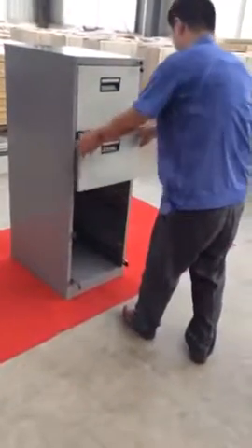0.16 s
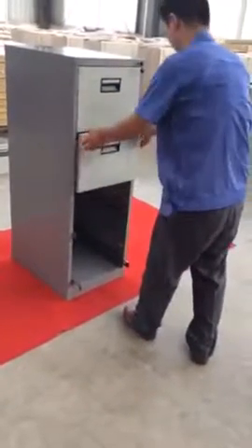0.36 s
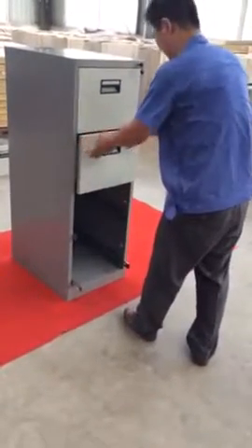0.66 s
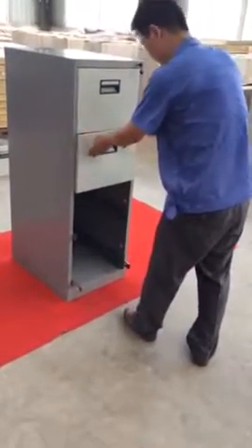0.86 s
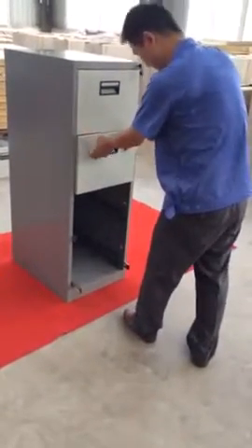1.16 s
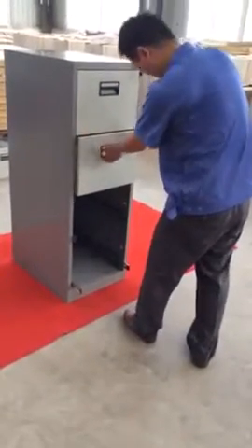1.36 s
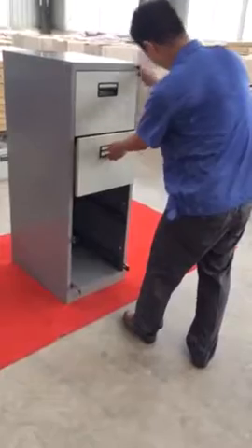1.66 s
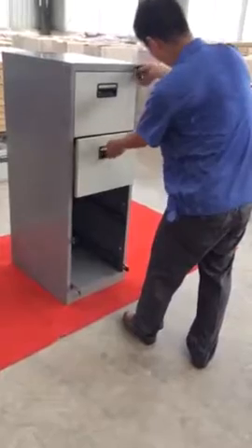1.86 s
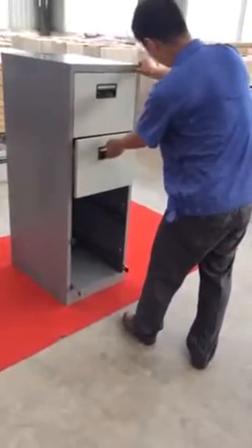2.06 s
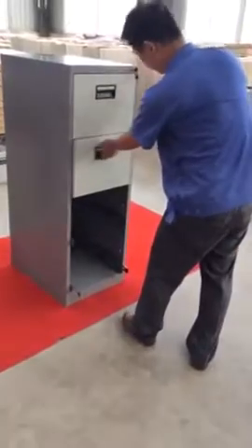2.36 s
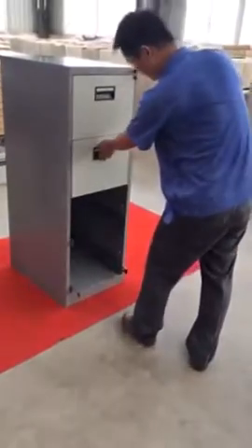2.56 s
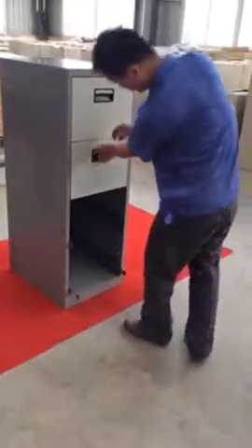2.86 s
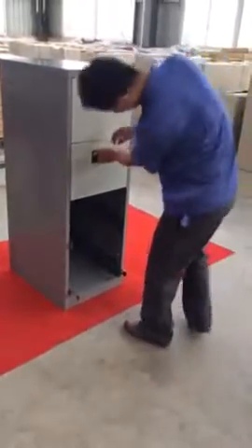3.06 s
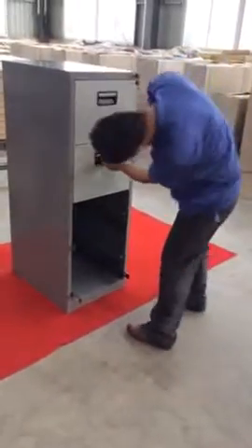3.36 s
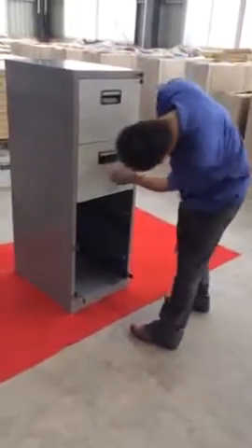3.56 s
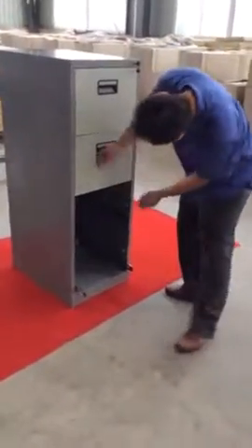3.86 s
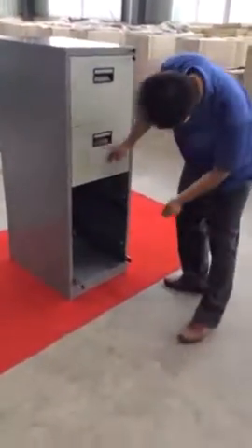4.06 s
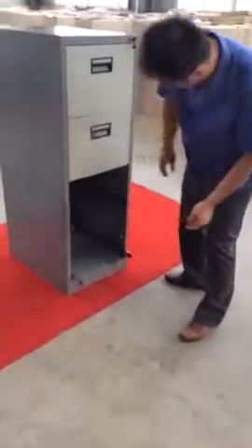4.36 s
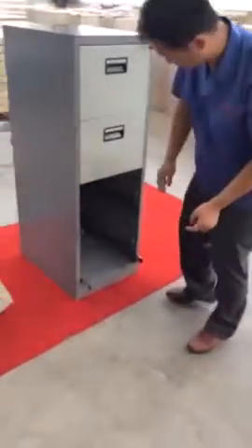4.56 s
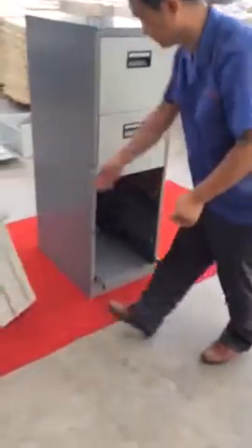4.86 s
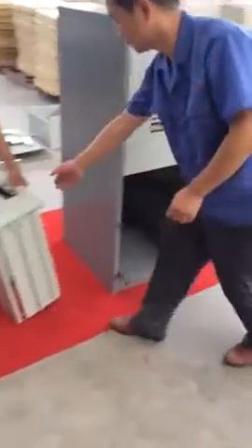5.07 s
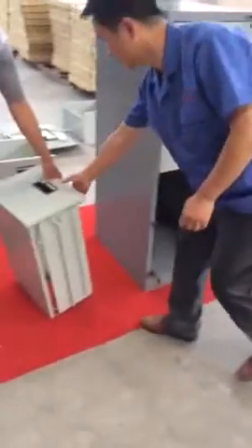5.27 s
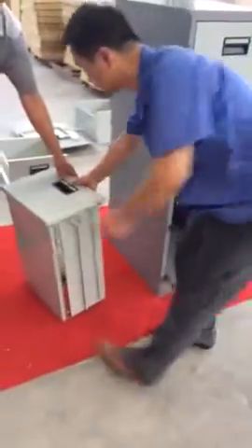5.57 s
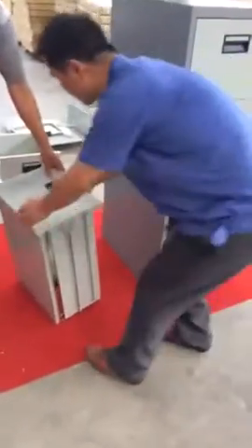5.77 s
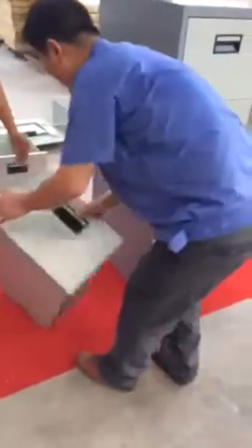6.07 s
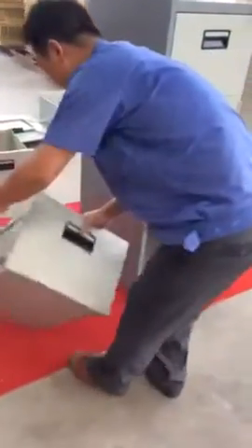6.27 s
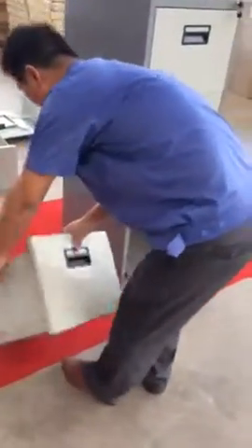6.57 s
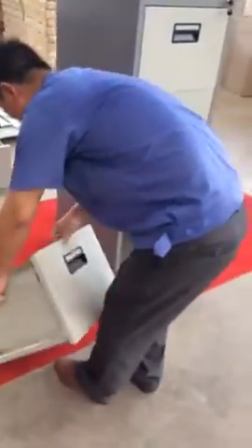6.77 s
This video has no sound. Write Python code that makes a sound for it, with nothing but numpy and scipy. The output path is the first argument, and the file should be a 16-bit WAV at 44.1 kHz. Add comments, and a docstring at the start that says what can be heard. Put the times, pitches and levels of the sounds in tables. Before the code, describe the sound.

In a large reverberant factory with a steady low machine hum, a sheet-metal drawer rattles along its slide and bangs in, with a lighter thud after. Faint handle and latch taps lead to the loudest slam, ringing hollowly. Compressed air hisses far off, with one dull knock over it; as it dies away, another drawer bumps and drags. Close, fairly dry mono pickup with slightly dulled top treble.

```python
"""A steel drawer is already scraping and squeaking along its runners, over the hum of machines.
It crashes into its filing cabinet; later it is slammed and pushed shut, and the next one is moved.
Each knock rings the sheet steel: many fading tones over a noisy crowd of weaker ones.
Scrapes are streams of tiny slips, squeaks are narrow noisy tones, and thumps are low fading swings.
Across the factory hall an air jet, made of coloured noise, hisses for some seconds; the hall echoes."""
import sys
import numpy as np
from scipy import signal
from scipy.fft import rfft, irfft, next_fast_len
from scipy.io import wavfile
from scipy.ndimage import uniform_filter1d

SR = 44100
rng = np.random.default_rng(int(sys.argv[2]) if len(sys.argv) > 2 else 0)


def wrap_up_sound(samples):
    """Save the sound to the file named by the first command line argument, as 16-bit audio."""
    columns = np.atleast_2d(samples).T
    # keep every value between -1 and 1, then stretch to whole-number steps
    tamed = np.clip(columns, -1, 1)
    steps = np.round(tamed * 32767).astype(np.int16)
    wavfile.write(sys.argv[1], SR, steps)


N = 304731
TIME = np.arange(N) / SR


def gain_of(db):
    """Turns decibels into a factor for loudness."""
    return 10 ** (np.asarray(db) / 20)


def evened(x):
    """Scales a sound to an average (rms) strength of one."""
    return x / np.sqrt(np.mean(x ** 2) + 1e-20)


def read(points, hz):
    """Reads a value between the rows of a table, with pitch on a log scale."""
    table_hz, value = np.transpose(points)
    return np.interp(np.log(hz + 1), np.log(table_hz + 1), value)


def fade(t, t60_s):
    """An even dying-away that loses 60 dB in t60_s seconds."""
    return np.exp(-np.log(1000) * t / t60_s)


def add(mix, start_s, sound):
    """Mixes a sound in at a given time, never before the beginning."""
    start = max(round(start_s * SR), 0)
    part = mix[start:][:len(sound)]
    part += sound[:len(part)]


def coloured(x, colour):
    """Makes some pitches of a sound stronger than others, then evens its strength."""
    hz = np.fft.rfftfreq(len(x), 1 / SR)
    return evened(irfft(rfft(x) * gain_of(read(colour, hz)), len(x)))


def noise(colour):
    """Steady noise of a given colour."""
    return coloured(rng.standard_normal(next_fast_len(N)), colour)[:N]


def wavering_tone(pitch_hz, width_hz, size):
    """Noise squeezed into a narrow band, so that it sounds like an unsteady tone."""
    hz = np.fft.rfftfreq(size, 1 / SR)
    resonance = 1 / (1 + (2 * (hz - pitch_hz) / width_hz) ** 2)
    return evened(irfft(rfft(rng.standard_normal(size)) * resonance, size))


def dying(x, t60_table):
    """Lets each band of a sound die away at its own speed."""
    hz, t, bands = signal.stft(x, SR, nperseg=256)
    bands = bands * fade(t, read(t60_table, hz)[:, None])
    return signal.istft(bands, SR, nperseg=256)[1][:len(x)]


def envelope(start_s, stop_s, rise_s, t60_s):
    """A smooth rise, a hold and a dying release."""
    rise = np.sin(np.pi / 2 * np.clip((TIME - start_s) / rise_s, 0, 1)) ** 2
    return rise * fade(np.maximum(TIME - stop_s, 0), t60_s)


# low wash of machinery in the hall: pitch_hz, level_db (per Hz, relative)
MACHINE_COLOUR = [(20, -34), (30, -6), (39, 2), (52, -3.5), (80, 3.5), (140, 1.5), (210, -1), (280, -3.5),
                  (450, -11.5), (1000, -19), (2000, -22.5), (4000, -28.5), (8000, -32.5), (10500, -37)]
# unsteady hum of the machines: pitch_hz, width_hz, level_db
MACHINE_HUM = [(191.6, 15.4, -45), (166.4, 52, -46.5), (143, 15, -52)]


def machinery(wash_db=-37.5):
    """Distant machines blend into a low wash of noise, with a few unsteady hums."""
    hum = sum(gain_of(db) * wavering_tone(hz, width_hz, N) for hz, width_hz, db in MACHINE_HUM)
    return gain_of(wash_db) * noise(MACHINE_COLOUR) + hum


# how long the hall echoes, until 60 dB weaker: pitch_hz, t60_s
HALL_T60 = [(100, 2.6), (500, 1.5), (2000, 2.73), (4500, 1.4), (7000, 1.38), (10500, 0.84)]


def hall(x, delay_s=.018, drift_hz=1.29, count=3):
    """Sound scatters around the hall in a long echo; its paths swell and fade in turn."""
    out = np.zeros(N)
    for k in range(count):
        tail = dying(rng.standard_normal(2 * SR), HALL_T60)
        tail = tail / np.linalg.norm(tail)
        share = np.sqrt(2 / count) * np.cos(np.pi * (drift_hz * TIME + k / count))
        add(out, delay_s, signal.fftconvolve(x * share, tail)[:N])
    return out


# hiss of the air jet: pitch_hz, level_db (per Hz, relative)
JET_COLOUR = [(400, -22), (1000, -16), (1600, -11), (2300, -6.5), (3200, -2), (5000, 0.5), (6700, 1.5),
              (8500, 0.5), (10500, -6.5)]
# the valve opens with a surge, the pressure settles and slowly sags, the valve shuts
JET_OPEN_S, JET_SHUT_S, JET_RISE_S, JET_T60_S = 2.913, 6.344, 0.21, 0.94
JET_DB = -30  # at the jet, before the scene mixes it in
JET_SURGE_DB, JET_SETTLE_S, JET_SAG_DB_PER_S = 3.5, .45, 0.33


def air_jet(flutter_db=1.23):
    """Turbulent air hisses with a strength that follows its pressure and flutters slightly."""
    flutter = rng.standard_normal(N)
    for _ in range(2):
        flutter = uniform_filter1d(flutter, size=1200)  # smoothing leaves only slow changes
    open_s = np.maximum(TIME - JET_OPEN_S, 0)
    surge_db = JET_SURGE_DB * np.exp(-open_s / JET_SETTLE_S)
    pressure_db = JET_DB + surge_db - JET_SAG_DB_PER_S * open_s
    valve = envelope(JET_OPEN_S, JET_SHUT_S, JET_RISE_S, JET_T60_S)
    return valve * noise(JET_COLOUR) * gain_of(pressure_db + flutter_db * evened(flutter))


# lowest ringing tones of the big side panels: pitch_hz, width_hz, level_db (relative)
DRUM_MODES = [(85, 15, -6), (113.5, 22, -0.5), (178, 34, -6)]
DRUM_START_S, DRUM_STOP_S, DRUM_RISE_S, DRUM_T60_S, DRUM_DB = 2.64, 2.9, .03, 0.65, -31.5


def drumming():
    """The big side panels go on booming at their lowest tones after the slam."""
    boom = evened(sum(gain_of(db) * wavering_tone(hz, width_hz, N) for hz, width_hz, db in DRUM_MODES))
    return gain_of(DRUM_DB) * envelope(DRUM_START_S, DRUM_STOP_S, DRUM_RISE_S, DRUM_T60_S) * boom


# whole cabinet jolted by a drawer going home:
# start_s, level_db (of the swing before it fades), pitch_hz, t60_s (time to fade by 60 dB)
THUMPS = [(0.331, -24.5, 155.6, 0.22), (0.901, -27, 106, .18), (2.634, -19, 101, .12),
          (2.648, -10.5, 169, 0.064), (3.961, -16, 97, .16)]


def thumps(rise_s=0.00085):
    """A jolt sets the big panels swinging at a low pitch that soon dies away."""
    out, t = np.zeros(N), np.arange(SR // 2) / SR
    for start_s, db, hz, t60_s in THUMPS:
        swing = -np.sin(2 * np.pi * hz * t) * (1 - np.exp(-t / rise_s))
        add(out, start_s, gain_of(db) * swing * fade(t, t60_s))
    return out


# squeaks of the runners: middle_s, length_s, pitch_hz, level_db (before the soft ends)
SQUEAKS = [(.012, 0.019, 7400, -44), (.032, 0.023, 7400, -46), (.054, 0.017, 7650, -45),
           (.16, 0.5, 3680, -55), (0.232, 0.049, 4050, -48), (1.454, 0.29, 1073, -53),
           (2.288, 0.04, 2920, -50.5)]


def squeaks(width_share=0.047):
    """Metal that sticks and slips gives short, rough tones."""
    out = np.zeros(N)
    for middle_s, length_s, hz, db in SQUEAKS:
        size = int(length_s * SR)
        soft_ends = signal.windows.tukey(size, .7)
        tone = wavering_tone(hz, width_share * hz, size) * soft_ends
        add(out, middle_s - length_s / 2, gain_of(db) * tone)
    return out


# clear ringing tones (modes) of cabinet and drawers: pitch_hz, level_db (relative), t60_s
STEEL_MODES = [(128, -7, .4), (183, 1, .3), (243, -3, .3), (362, -10, .3), (474, -8, .4), (521, -4, .25),
               (560, -10, .35), (655, -3, .28), (690, -5, .25), (768, -3, .33), (917, -3, .29),
               (968, -7, .26), (1068, -3, .28), (1108, -9, .35), (1266, 1, .2), (1311, -2, .22),
               (1415, 0, .18), (1490, -4, .16), (1696, -8, .2), (2320, -1, .17), (2820, -3, .15),
               (3159, -4, .16), (3816, -11, .11), (4718, -7, .13), (4965, -5, .13), (5100, -6, .13)]
# crowd of weaker modes between them: pitch_hz, level_db (per Hz, relative)
STEEL_CROWD = [(50, -11), (150, 11), (350, 7.5), (700, 6), (1400, 3.5), (2000, 2), (3500, 1), (5200, -0.5),
               (7200, -2.5), (10500, -5)]
# how long that crowd rings, until 60 dB weaker: pitch_hz, t60_s
STEEL_CROWD_T60 = [(100, 0.48), (500, 0.33), (1400, 0.24), (4000, 0.18), (10000, 0.16)]


def sheet_steel(modes_db=-13, scatter_db=1.5, detune=0.0012, size=26460):
    """One blow rings clear modes, stirred differently at each spot, over a crowd of weak ones."""
    t = np.arange(size) / SR
    hz, db, t60_s = np.transpose(STEEL_MODES)[:, :, None]
    spot, strain = rng.standard_normal((2,) + hz.shape)
    bent_hz = hz * (1 + detune * strain)  # a flexed sheet shifts its pitch
    swing = np.sin(2 * np.pi * (bent_hz * t + rng.random(hz.shape)))
    modes = (gain_of(db + scatter_db * spot) * fade(t, t60_s) * swing).sum(0)
    crowd = dying(coloured(rng.standard_normal(size), STEEL_CROWD), STEEL_CROWD_T60)
    return gain_of(modes_db) * modes + crowd


# strokes of a drawer along its runners or over the floor:
# middle_s, length_s, scrape_db, swish_db (both at the fastest moment)
STROKES = [(.03, 1.02, -37.5, -53.5), (1.658, .64, -47, -51), (2.11, 0.22, -41, -63),
           (2.643, 0.5, -43.5, -55), (6.873, 0.95, -34.5, -52)]


def strokes(scrape_power=0.53, swish_power=1.7):
    """Each stroke speeds up and slows down in one arch; scrape and swish grow as powers of speed."""
    scrape, swish = np.zeros((2, N))
    for middle_s, length_s, scrape_db, swish_db in STROKES:
        speed = np.maximum(1 - (2 * (TIME - middle_s) / length_s) ** 2, 0)
        scrape += gain_of(scrape_db) * speed ** scrape_power
        swish += gain_of(swish_db) * speed ** swish_power
    return scrape, swish


# scrape of a dragged drawer: pitch_hz, level_db (per Hz, relative)
DRAG_COLOUR = [(100, 11.5), (300, 5), (700, 2.5), (1200, 4), (2000, 1.5), (3700, 2.5), (6000, -3),
               (10500, -35)]
# fine swish of ball slides and handled sheet metal: pitch_hz, level_db (per Hz, relative)
SWISH_COLOUR = [(800, -15), (2000, -17), (3200, -6), (5000, -3), (8000, -1), (10500, -11)]


def runners(slips_per_s=220, spread_db=2.0, count=4):
    """Tiny uneven slips rattle the steel at several contact points, under the swish of the slides."""
    rattle, length = np.zeros(N), N + SR  # one second of lead-in: the drawer is already moving
    for _ in range(count):
        uneven_db = spread_db * np.minimum(rng.exponential(1, length), 4)
        strength = gain_of(uneven_db) * rng.choice([-1, 1], length)
        slips = strength * (rng.random(length) < slips_per_s / SR)
        steel = sheet_steel(modes_db=-24.5)  # the hand damps the clear modes
        rattle += signal.fftconvolve(slips, steel)[SR:length]
    scrape, swish = strokes()
    return scrape * coloured(rattle, DRAG_COLOUR) + swish * noise(SWISH_COLOUR)


# knocks of drawer, runner and latch, in order: the drawer catches on its runners and crashes in,
# is nudged up to the frame, handle and latch are tried, the slam and its rebounds,
# a last dull push on the shut drawer, then the next drawer bumps as it is lifted:
# start_s, level_db (over the first 20 ms), contact_hz (pitch of the contact), q (its sharpness, no unit)
KNOCKS = [ (.292, -35, 1710, 1.4), (.308, -28, 1840, 0.93), (0.318, -30.5, 8000, .6),
          (0.3234, -20, 5050, 1.4), (.327, -24.5, 1360, 1.06), (.344, -25, 3300, 0.3),
          (.856, -39.5, 3800, 0.35), (.863, -31.5, 1530, 1.1), (.868, -38.5, 5000, 1.1),
          (.902, -30, 700, .4), (.916, -30, 770, 0.43), (2.023, -45, 1400, 1.4), (2.037, -37.5, 1520, 0.91),
          (2.038, -51, 8100, 2.5), (2.092, -41, 3800, 0.65), (2.100, -36.5, 1400, 1.3),
          (2.155, -45.5, 4600, 1), (2.325, -44, 1810, 1.3), (2.485, -39.5, 1430, 4.3),
          (2.514, -51, 7000, 0.99), (2.626, -24, 1950, 0.49), (2.627, -43, 8800, 1.6),
          (2.631, -21.5, 1000, 0.33), (2.646, -30.5, 1290, 0.68), (2.659, -39.5, 7500, 1.1),
          (2.673, -37, 1040, 2.1), (3.959, -27.5, 374, 1.37), (3.965, -34.5, 740, 2.3),
          (3.985, -38.5, 1150, 1.1), (4.002, -38, 746, 3.4), (6.55, -40, 704, .8),
          (6.83, -40.5, 1100, 0.57)]


def knocks(edge_db=-25, rise_s=0.00017, reach=0.94):
    """Low, dull contacts stir the big panels; bright, sharply pitched ones ring only small parts."""
    out = np.zeros(N)
    for start_s, db, contact_hz, q in KNOCKS:
        low_hz = contact_hz / (1 + reach / q)  # a damped contact reaches further down into the panels
        high_pass = signal.butter(2, low_hz, "high", fs=SR, output="sos")
        ring = signal.sosfilt(high_pass, sheet_steel())
        # the springy contact rings at its own pitch and dulls all above it
        w = 2 * SR * np.tan(np.pi * min(contact_hz, SR / 3) / SR)
        contact = signal.bilinear([w * w], [1, w / q, w * w], SR)
        # bare edges leak a little treble past the contact
        ring = signal.lfilter(*contact, ring) - gain_of(edge_db) * ring
        ring *= 1 - np.exp(-np.arange(len(ring)) / SR / rise_s)
        add(out, start_s, gain_of(db) * ring / np.std(ring[:SR // 50]))
    return out


def scene(near_wet_db=-20, jet_dry_db=-3, jet_wet_db=-4):
    """The cabinet is close and fairly dry; the jet is far off and rich in echo."""
    jet = air_jet()
    cabinet = drumming() + thumps() + squeaks() + runners() + knocks()
    echo = hall(gain_of(near_wet_db) * cabinet + gain_of(jet_wet_db) * jet)
    mono = machinery() + echo + gain_of(jet_dry_db) * jet + cabinet
    return np.array([mono, mono])


def record(dry, edge_hz=10750):
    """One microphone feeds both channels, with the treble cut off steeply above edge_hz."""
    low_pass = signal.firwin(601, edge_hz, window=("kaiser", 9), fs=SR)
    return signal.oaconvolve(dry, low_pass[None], "same")


dry = scene()
out = record(dry)
wrap_up_sound(out)
```